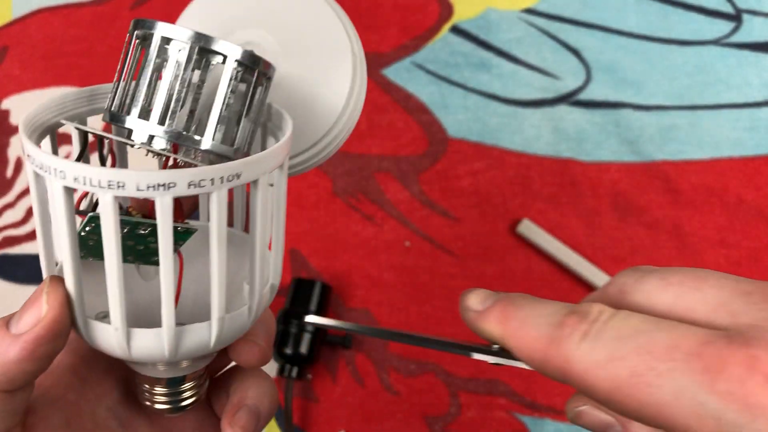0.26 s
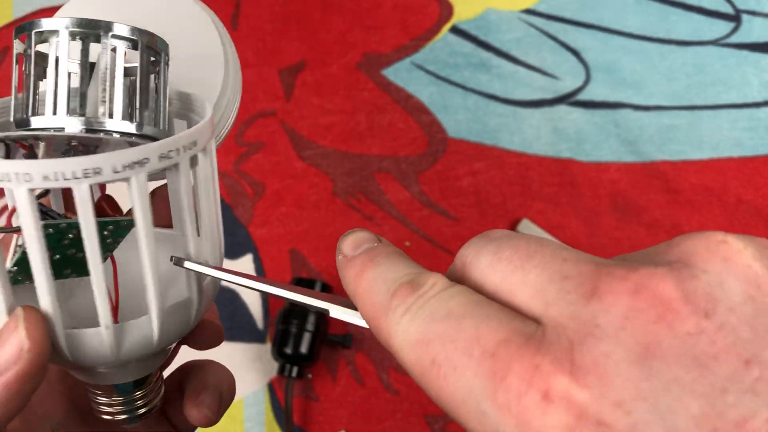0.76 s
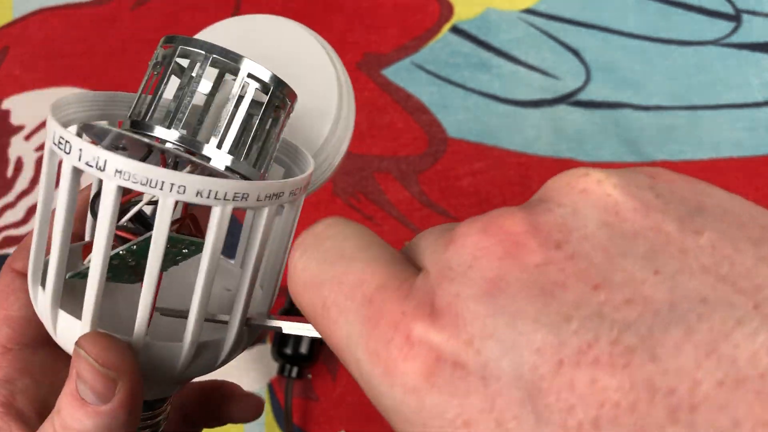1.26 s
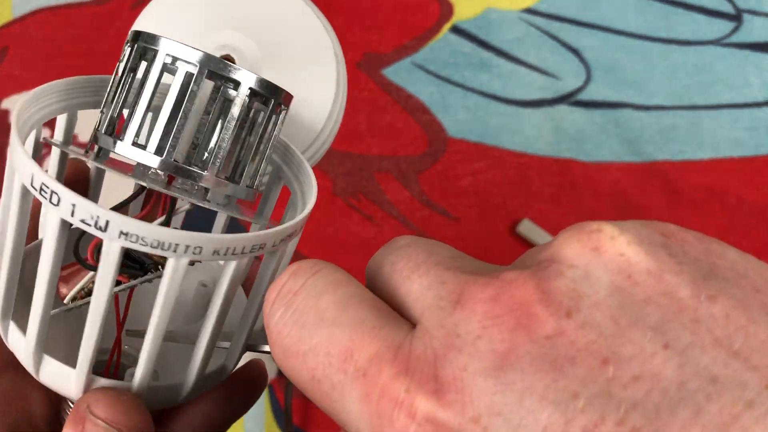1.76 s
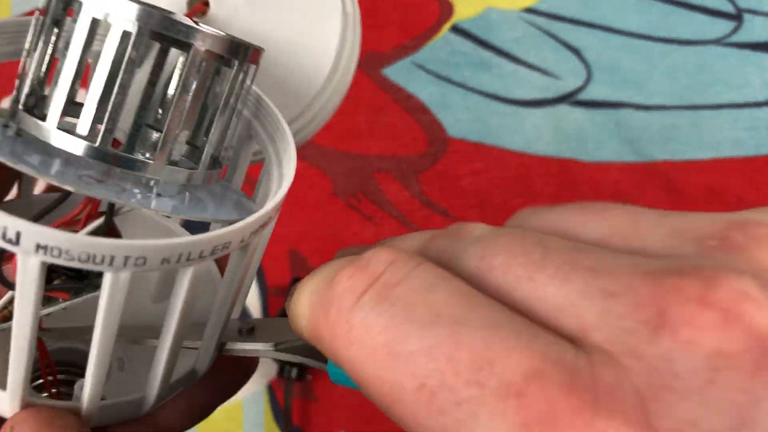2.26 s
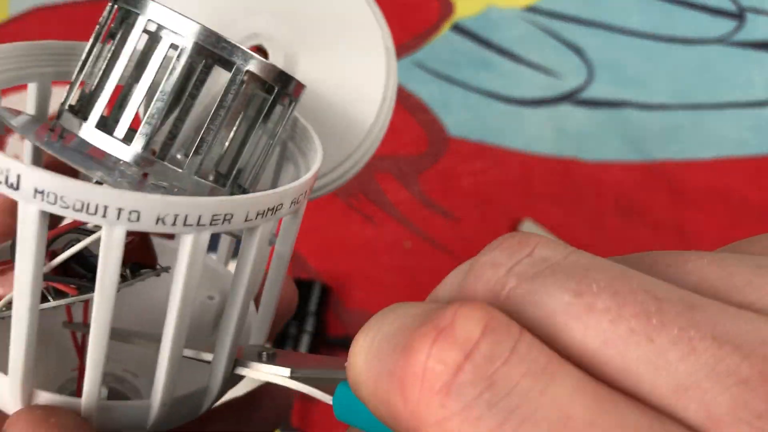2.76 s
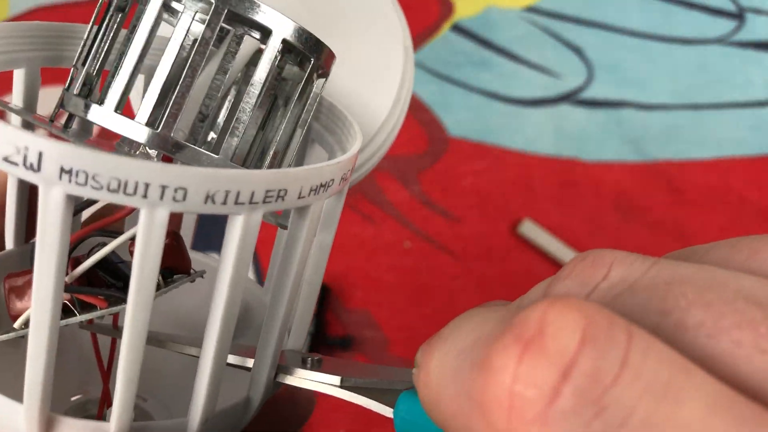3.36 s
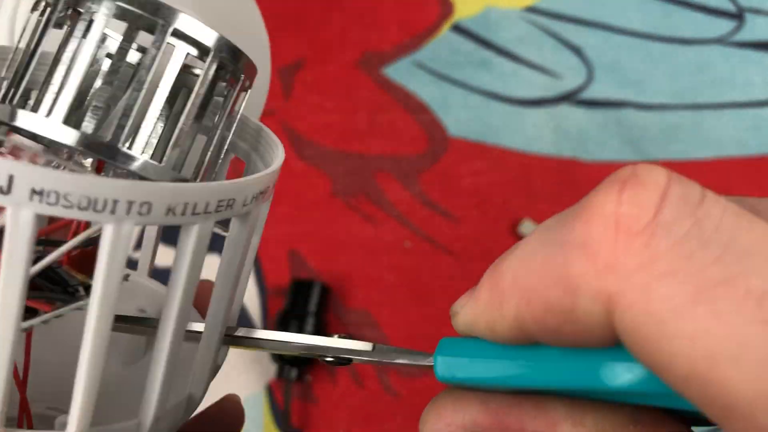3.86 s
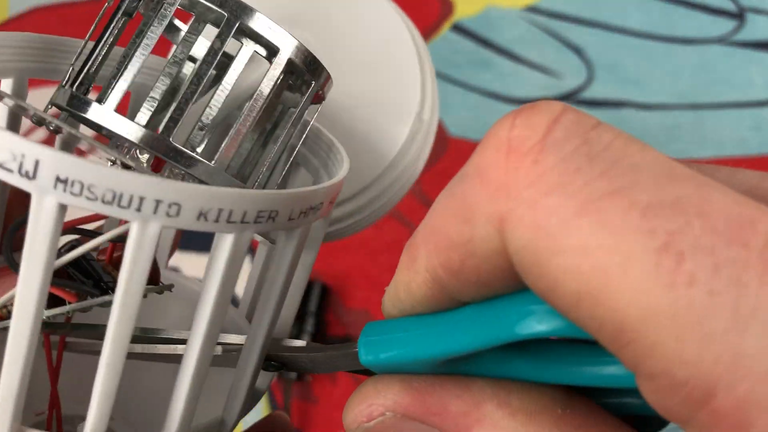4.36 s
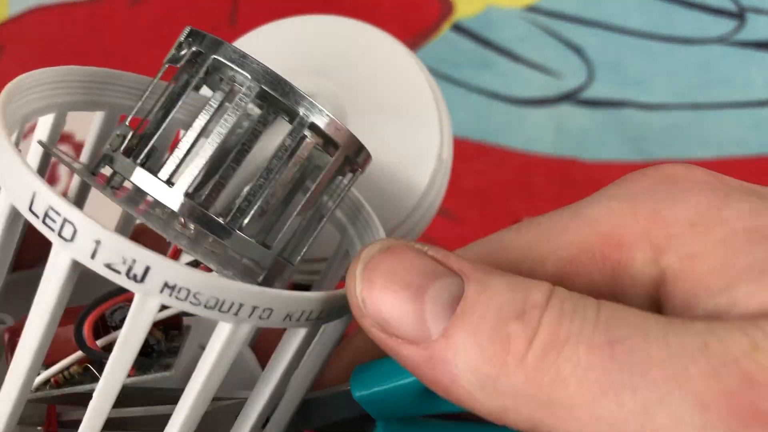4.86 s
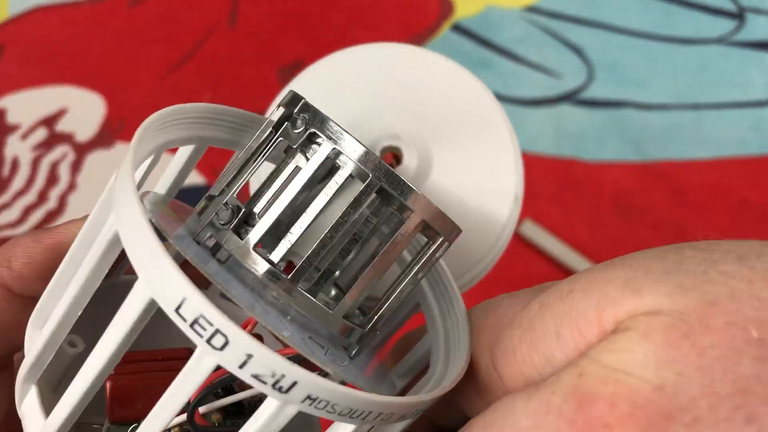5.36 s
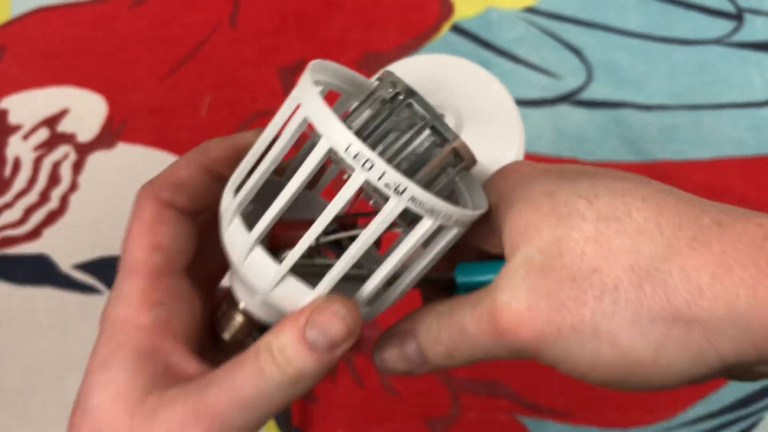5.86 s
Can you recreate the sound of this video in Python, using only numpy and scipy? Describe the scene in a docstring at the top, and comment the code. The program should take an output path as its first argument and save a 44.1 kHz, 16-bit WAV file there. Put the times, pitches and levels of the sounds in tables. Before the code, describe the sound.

In a small room with faint hiss and a low hum, a hand shifts softly on a hollow plastic bulb cage. Close to the microphone, scissor blades scrape its bars in short strokes, mixed with uneven clusters of small clicks, thin metallic slides and dull knocks. After a sharper click, the blades finally shut through a bar: one loud snap that sets the steel ringing briefly, with a short room echo.

```python
"""A short scrape of steel on plastic, close to the microphone in a small quiet room: scissors at work
on the cage of a lamp. The blades rasp on the bars and sing as they slide over each other, while the
hollow cage clicks and knocks in the hand. Near the end one bar snaps, a double crack that sets the
steel ringing and wakes the room. Room tone and mains hum lie below."""
import sys
import numpy as np
from scipy import signal
from scipy.fft import rfft, irfft
from scipy.io import wavfile
from scipy.ndimage import uniform_filter1d

SR = 44100
rng = np.random.default_rng(int(sys.argv[2]) if len(sys.argv) > 2 else 0)


def generate_wav(sig):
    """Save sig (samples, or channels by samples) to the path in sys.argv[1] as 16-bit PCM at SR."""
    pcm = np.round(np.clip(np.atleast_2d(sig).T, -1, 1) * 32767).astype(np.int16)
    wavfile.write(sys.argv[1], SR, pcm)


N = 269123
HZ = np.fft.rfftfreq(4096, 1 / SR)  # frequency axis of the filter curves
T = np.arange(8192) / SR  # time axis of one impact
LEAD_S = 0.06  # a stroke is already brushing this long before it has its full force

# an edge scrapes along a bar: t/s, length/s, relative level/dB, swell/dB, hollow body/dB re level
EDGE_STROKES = [(0.0, 0.0074, -56, -4, -5), (0.199, 0.029, -67.5, -5, -12), (0.86, .05, -68.5, 1, -9),
                (0.93, 0.034, -55.5, -3.5, 0.5), (1.065, 0.14, -60.5, 3.5, -10),
                (1.269, 0.023, -58, -2, 2.5), (1.695, .065, -66, 0, -3), (1.83, 0.0091, -65, 0, -11),
                (1.977, 0.053, -54, 3.5, -15), (2.17, .03, -70.5, -6, 0), (2.375, 0.051, -54, -3, -6.5),
                (2.458, 0.075, -73, 1, 5.5), (2.75, 0.13, -72, 5, -7), (3.26, .075, -69.5, 4.5, 0),
                (3.71, 0.044, -61, 3, -4.5), (3.769, 0.051, -52, -3, -13.5),
                (3.864, 0.067, -51.5, 5.5, -13), (4.17, 0.03, -54, 1, -23), (4.223, 0.018, -49.5, -1, 0),
                (4.26, 0.028, -67, -4, -3), (4.57, 0.094, -75.5, 5, -4), (4.688, 0.013, -66, 1, 11),
                (4.728, 0.025, -51.5, 4, -4.5), (5.062, 0.02, -63.5, 2, 0), (5.187, .01, -66, 0, 5),
                (5.32, .06, -72, -1, 0.5), (5.664, 0.02, -65, -8, -6), (6.047, .053, -65.5, -3, -20)]
# the cage is bumped and gives way: t/s, relative level/dB, f/Hz, t60/s, swing either side of f/octaves
CAGE_BUMPS = [(0.844, -52.5, 740, 0.03, 1), (0.93, -54, 910, 0.028, 0.68), (0.971, -49.5, 950, 0.02, 0.71),
              (0.998, -55.5, 170, 0.033, 0.62), (1.226, -52.5, 221, 0.045, 0.78),
              (1.497, -54.5, 1380, 0.04, 0.28), (1.733, -56.5, 400, 0.029, 0.84),
              (2.03, -52.5, 904, 0.016, 1.08), (2.147, -49, 175, 0.041, 0.72), (2.36, -57, 156, 0.042, 0.8),
              (2.48, -60, 132, 0.035, 0.67), (2.612, -54.5, 163, 0.056, 0.98),
              (3.778, -55, 170, 0.035, 0.73), (3.91, -46.5, 227, 0.058, 1.13),
              (3.927, -47, 200, 0.035, 0.77), (4.159, -49, 154, 0.051, 0.59), (4.22, -48, 434, 0.034, 0.47),
              (4.235, -45.5, 131, 0.032, 0.5), (4.266, -53.5, 227, 0.048, 0.8),
              (4.492, -48.5, 206, 0.065, 0.84), (4.7534, -33.5, 742, 0.03, 1.17),
              (4.769, -55, 400, 0.03, 1.04), (5.122, -57.5, 800, 0.025, 0.7),
              (5.228, -52, 193, 0.076, 0.79), (5.525, -62, 600, 0.042, 0.7)]
# modes of the plastic cage with the blades on it: f/Hz, level/dB, t60/s
CAGE_MODES = [(1225, 4.5, 0.04), (1665, 6, 0.078), (1986, 10.5, 0.085), (2890, 0, 0.061), (2910, -1, 0.049),
              (3890, 4.5, 0.079), (5240, -4, 0.038), (5550, -2, 0.064), (6250, -2, 0.029)]


def amp(db):
    """Decibels to gain."""
    return 10 ** (np.asarray(db) / 20)


def unit_rms(x):
    """Scales to rms 1."""
    return x / np.sqrt(np.mean(x ** 2) + 1e-20)


def unit_energy(x):
    """Scales to energy 1."""
    return x / (np.linalg.norm(x) + 1e-12)


def curve(points, hz=HZ):
    """Interpolates a table along a log-frequency axis."""
    f, value = np.transpose(points)
    return np.interp(np.log(hz + 1), np.log(f + 1), value)


def fade(t, t60):
    """Falls 60 dB in t60 seconds."""
    return np.exp(-np.log(1000) * t / np.maximum(t60, 1e-4))


def add(mix, s, sound):
    """Lays a sound into the mix at time s."""
    start = round(s * SR)
    sound = sound[max(-start, 0):]
    part = mix[max(start, 0):][:len(sound)]
    part += sound[:len(part)]


def colour(x, gain_db):
    """Minimum-phase filter with the given dB at the frequencies HZ."""
    log_gain = np.log(amp(np.maximum(gain_db, -100)))
    mirrored = np.r_[log_gain, log_gain[-2:0:-1]]
    response = np.exp(np.conj(signal.hilbert(mirrored)))
    return signal.oaconvolve(x, irfft(response[:len(HZ)]))[:len(x)]


def hump(hz, octaves, steep=1):
    """A peak in dB around hz."""
    return -10 * steep * np.log10(1 + (np.log2((HZ + 1) / hz) / octaves) ** 2)


def band(lo_hz, hi_hz, order=3):
    """A pass band in dB."""
    return -10 * np.log10((1 + (lo_hz / (HZ + 1)) ** (2 * order)) * (1 + (HZ / hi_hz) ** (2 * order)))


def flicker(samples):
    """Noise of rms 1, smoothed over this many samples."""
    return unit_rms(uniform_filter1d(rng.standard_normal(N), size=samples))


def stroke(length, db, swell_db, release_t60, attack_t60=0.053):
    """Force of one movement, from LEAD_S before its start: it bites, swells or sags, and lets go."""
    t = np.arange(SR // 2) / SR - LEAD_S
    hold = amp(db + swell_db * (np.clip(t / length, 0, 1) - 0.5))
    return fade(np.maximum(-t, 0), attack_t60) * hold * fade(np.maximum(t - length, 0), release_t60)


def room_tone(air_db=-69.5, rumble_db=-65, waver_rad=0.4):
    """The bed of the quiet room: air, a narrow low rumble and wavering mains hum."""
    # spectrum of the room air: f/Hz, relative level/dB
    air_spectrum = [(40, -21), (80, -11), (100, 0.5), (150, -8.5), (230, -11), (380, -20), (560, -23),
                    (1400, -31.5), (2300, -32), (2900, -31), (4000, -31), (10000, -32.5), (16000, -43.5)]
    # partials of the hum: f/Hz, level/dB
    hum_partials = [(58, -67), (120, -68.5)]
    t = np.arange(N) / SR
    air = colour(rng.standard_normal(N), curve(air_spectrum) + band(90, 20000))
    rumble = colour(rng.standard_normal(N), band(49, 67.5, order=8))
    hum = 0
    for hz, db in hum_partials:
        drift = sum(np.sin(2 * np.pi * (f * t + rng.random())) / np.sqrt(f)
                    for f in np.geomspace(0.3, 6, 20))
        hum += amp(db) * np.sqrt(2) * np.sin(2 * np.pi * hz * t + waver_rad * unit_rms(drift))
    return amp(air_db) * unit_rms(air) + amp(rumble_db) * unit_rms(rumble) + hum


def hand_rub(gain_db=-3, flutter_db=3, slip_db=-8):
    """Skin rubs softly and unevenly on the plastic; each knock makes the cage slip in the hand."""
    # steady rub of the holding hand: t/s, relative level/dB
    grip_levels = [(0.0, -67.5), (0.8, -68), (1.3, -65.5), (2.3, -69), (3.1, -74), (4.1, -67.5),
                   (5.4, -68.5), (6.1, -70)]
    # spectrum of skin on plastic: f/Hz, relative level/dB
    skin_spectrum = [(60, -17.5), (100, 0), (160, -1.5), (280, -2.5), (390, -2), (540, -14.5), (880, -14),
                     (2500, -19.5), (6000, -27)]
    slip = np.zeros(N)
    for s, db, *_ in CAGE_BUMPS:
        add(slip, s - LEAD_S, stroke(0.011, db + slip_db, swell_db=0, release_t60=0.09))
    grip = amp(np.interp(np.arange(N) / SR, *np.transpose(grip_levels)))
    flutter = amp(flutter_db * flicker(1200))
    rub = unit_rms(colour(rng.standard_normal(N), curve(skin_spectrum)) * flutter)
    return amp(gain_db) * np.hypot(grip, slip) * rub


def scraping(slips_per_s=5500, spread_db=2.5, judder_db=1.86, fizz_db=-6, hard_db=-52,
             blade_db=-13, blade_hz=2770, body_db=-1):
    """Tiny slips of steel on plastic rasp and stir the blades and hollow cage; hard strokes fizz."""
    # spectrum of the edge on a bar: f/Hz, relative level/dB
    rasp_spectrum = [(500, -20), (1200, -3), (1900, 0.5), (2300, -12), (2900, 0.5), (3800, 0), (5500, 1),
                     (7500, -2), (9000, -2), (11500, -6.5), (15500, -16)]
    # air and walls of the cage: f/Hz, relative level/dB
    hollow_spectrum = [(250, -14), (400, -2.5), (560, -10.5), (880, 0), (1050, -5), (1250, 1), (1500, -7.5),
                       (2500, -20)]
    force, body_force = np.zeros((2, N))
    for s, length, db, swell_db, hollow_db in EDGE_STROKES:
        push = stroke(length, db, swell_db, release_t60=0.078)
        add(force, s - LEAD_S, push)
        add(body_force, s - LEAD_S, amp(hollow_db) * push)
    sizes = amp(spread_db * np.minimum(rng.exponential(1, N), 4)) * rng.choice([-1, 1], N)
    judder = amp(judder_db * flicker(220))
    slipping = rng.random(N) < slips_per_s / SR
    slips = travelling_contact(sizes * slipping * judder)
    rasp = unit_rms(colour(slips, curve(rasp_spectrum)))
    hiss = unit_rms(colour(rng.standard_normal(N) * judder, band(9000, 15000)))
    fizz = hiss * np.sqrt(force / amp(hard_db))
    body = unit_rms(colour(slips, curve(hollow_spectrum)))
    edge = rasp + amp(fizz_db) * fizz + amp(blade_db) * blade_song(N, blade_hz)
    return force * edge + body_force * amp(body_db) * body


def travelling_contact(x, depth_db=4.5):
    """As the contact point travels, narrow resonances swell and fade."""
    spectra = signal.stft(x, nperseg=512, noverlap=384)[2]
    patches = uniform_filter1d(rng.standard_normal(spectra.shape), size=4, axis=0)
    patches = unit_rms(uniform_filter1d(patches, size=9, axis=1))
    return unit_rms(signal.istft(spectra * amp(depth_db * patches), nperseg=512, noverlap=384)[1][:N])


def blade_song(n, pitch_hz):
    """Even friction noise in the resonances of the blades."""
    # resonances of the sliding blades: multiple of the pitch, width/Hz, relative level/dB
    resonances = [(1, 364, 6.5), (3.15, 550, -8)]
    gain = sum(amp(db) / (1 + (2 * (HZ - k * pitch_hz) / width) ** 2) ** 0.69
               for k, width, db in resonances)
    return unit_rms(colour(rng.standard_normal(n), 20 * np.log10(gain)))


def glides(gain_db=-1):
    """Blade runs over blade as the scissors open and close; the pitch depends on where they touch."""
    # strokes of steel on steel: t/s, length/s, relative level/dB, swell/dB, f/Hz
    blade_strokes = [(0.0, 0.024, -61, -14, 3000), (0.178, 0.0091, -61.5, 3, 2940),
                     (0.489, .032, -75.5, -2, 2900), (1.209, 0.12, -67, 2, 2830),
                     (1.745, .04, -65, -6, 2830), (2.049, 0.047, -62.5, -2, 2830),
                     (2.4, .13, -65, -9, 2900), (2.597, .028, -70, -2, 2900), (2.741, 0.021, -63, 3, 3120),
                     (2.819, 0.056, -69, 1, 2830), (2.941, 0.03, -72, 0, 2830),
                     (3.021, 0.2, -75.5, 5, 2830), (3.247, .09, -62, -9, 2780),
                     (3.606, 0.023, -71.5, 7, 2830), (3.711, .1, -59.5, -7, 2950),
                     (4.23, .055, -59.5, -6, 2830), (4.554, 0.11, -64, 4, 3120), (4.7, 0.08, -56, -3, 2900),
                     (5.064, 0.019, -62, 1, 2950), (5.299, .09, -70, -4, 2900),
                     (6.059, .042, -62, -4, 2980)]
    out = np.zeros(N)
    for s, length, db, swell_db, hz in blade_strokes:
        push = stroke(length, db + gain_db, swell_db, release_t60=0.097)
        add(out, s - LEAD_S, push * blade_song(len(push), hz))
    return out


def chatter(t60, rise_s=0.0002):
    """A dying burst of tiny impacts, with an even spectrum."""
    onset = 1 - np.exp(-T / rise_s)
    burst = rng.standard_normal(len(T)) * onset * fade(T, t60)
    for _ in range(2):
        whitened = irfft(np.exp(1j * np.angle(rfft(burst))))
        burst = whitened * onset * fade(T, 2 * t60)
    return unit_energy(burst)


def impact(shape_db, t60, rise_s=0.0002):
    """A burst of chatter filtered to a spectrum, with energy 1."""
    return unit_energy(colour(chatter(t60, rise_s), shape_db))


def ring(modes, detune=0):
    """Dying modes; detune is how far the grip shifts them from blow to blow."""
    out = np.zeros(len(T))
    for hz, db, t60 in modes:
        pitch = hz * (1 + detune * rng.standard_normal())
        out += amp(db) * fade(T, t60) * np.sin(2 * np.pi * pitch * T)
    return unit_energy(out)


def click(db, hz, ring_db, edge_hz, t60, body_db=19, tone_db=20, cage_db=-10, ring_t60=0.034):
    """A contact chatters briefly and rings one mode and its neighbour, the rest of the cage faintly."""
    shape = amp(band(1840, edge_hz, order=5)) + amp(band(570, 1300) - 15)
    body = impact(20 * np.log10(shape), t60, rise_s=0.00019)
    cage = unit_energy(signal.fftconvolve(body, ring(CAGE_MODES, detune=0.06))[:len(T)])
    pair = [(hz, 0, ring_t60), (hz * rng.uniform(0.78, 1.16), -8, ring_t60)]
    tone = unit_energy(signal.fftconvolve(chatter(t60 / 2), ring(pair))[:len(T)])
    return amp(db) * (amp(body_db) * (body + amp(cage_db) * cage) + amp(tone_db + ring_db) * tone)


def clicks(scatter_s=0.15):
    """Blades and cage tick together, with one faint tick near each scrape as the blade seeks its place."""
    # clear contacts: t/s, relative level/dB, ring f/Hz, ring gain/dB, upper edge/Hz, chatter t60/s
    contacts = [(0.055, -49.5, 2050, -22, 6500, 0.024), (0.068, -59, 3570, 0, 9300, 0.019),
                (0.193, -55, 9980, 8, 11400, 0.019), (0.3407, -64.5, 4630, -7, 8950, 0.017),
                (0.432, -57, 3530, 6.5, 5200, 0.017), (0.663, -58.5, 2610, -8, 6500, 0.062),
                (0.671, -61, 2640, 2.5, 5100, 0.024), (0.796, -63, 3640, -11, 6200, 0.0066),
                (0.8184, -58.5, 1630, -5, 4300, 0.047), (0.8438, -55, 4300, -2, 7450, 0.0099),
                (0.9719, -53.5, 2860, 4, 3230, 0.013), (1.0533, -55.5, 2820, 0.5, 8200, 0.082),
                (1.225, -51, 2870, -11, 5600, 0.016), (1.2636, -45.5, 1180, -3.5, 11100, 0.065),
                (1.3107, -53.5, 10980, -3, 10900, 0.046), (1.403, -61, 1700, 3, 4600, 0.036),
                (1.4898, -52, 2400, -3.5, 4870, 0.079), (1.6482, -64, 1300, 3.5, 8500, 0.04),
                (1.678, -58, 2010, -3, 7500, 0.054), (1.7324, -42.5, 3260, -9, 7750, 0.071),
                (1.852, -63, 1640, 3, 2300, 0.022), (1.9382, -59.5, 1670, 5.5, 2680, 0.029),
                (1.9836, -54, 3110, 1, 9800, 0.047), (2.03, -48, 5200, -8, 9800, 0.02),
                (2.056, -46, 1930, -2, 6100, 0.049), (2.0694, -35.5, 2870, -16, 11200, 0.016),
                (2.146, -52.5, 1940, -2, 4900, 0.08), (2.1638, -51.5, 4920, -1.5, 10800, 0.023),
                (2.2608, -57, 1980, -0.5, 5570, 0.073), (2.3534, -49, 1670, -13, 7700, 0.033),
                (2.3616, -42, 1630, -2, 6830, 0.031), (2.4017, -41, 2020, -1.5, 9000, 0.027),
                (2.4504, -49, 1700, -1, 6500, 0.029), (2.4834, -40, 1620, -2.5, 8800, 0.05),
                (2.5225, -56, 1430, -2, 6100, 0.043), (2.802, -56, 10700, 3, 12400, 0.026),
                (2.8392, -58, 2740, -1, 7300, 0.029), (3.141, -56, 2710, -2, 4140, 0.021),
                (3.7462, -52, 2870, -12, 11300, 0.043), (3.7619, -43, 10230, -6, 13500, 0.068),
                (3.7768, -43.5, 2020, -5, 8100, 0.085), (3.825, -49, 1960, 4, 3000, 0.1),
                (3.906, -43.5, 2720, 0.5, 5900, 0.034), (3.9279, -43.5, 3430, -1.5, 4100, 0.015),
                (4.159, -54, 3510, 2, 8000, 0.051), (4.219, -50, 5970, -2, 8800, 0.042),
                (4.2236, -37.5, 5630, -4.5, 9100, 0.022), (4.227, -47, 2820, -4, 10300, 0.032),
                (4.2377, -41, 6300, -2, 7200, 0.015), (4.268, -40, 2700, -5.5, 9700, 0.044),
                (4.3014, -57.5, 3000, 1, 11000, 0.024), (4.3209, -55, 2240, -21, 4370, 0.044),
                (4.4918, -51.5, 3470, -0.5, 4400, 0.035), (4.6895, -48.5, 2700, -5, 10600, 0.048),
                (4.7538, -32.5, 5670, -7.5, 10500, 0.002), (4.7696, -48.5, 3770, 0, 4100, 0.077),
                (4.8556, -57, 1960, -3, 3900, 0.029), (5.009, -60, 11400, -6, 11300, 0.018),
                (5.122, -62, 2940, -1, 6000, 0.059), (5.182, -53.5, 4700, -9, 10900, 0.064),
                (5.2109, -52, 3160, -4, 4400, 0.065), (5.325, -51.5, 1580, -2.5, 3700, 0.051),
                (5.342, -50.5, 3210, 1, 4900, 0.011), (5.3701, -53, 1970, -5, 5700, 0.081),
                (5.421, -57.5, 6760, -3, 9900, 0.049), (5.451, -57.5, 1810, -8, 4200, 0.079),
                (5.524, -57.5, 3480, 0.5, 3500, 0.045), (5.6032, -56.5, 2710, -8, 3900, 0.035),
                (5.6542, -56, 6900, -6, 10300, 0.067), (5.6812, -54, 1600, -2, 4300, 0.025),
                (5.726, -45, 7330, -4, 11400, 0.023), (5.7385, -50, 3000, -5, 13000, 0.017),
                (6.0357, -50.5, 2990, -3, 12740, 0.016), (6.0467, -49.5, 2800, -9, 6300, 0.014),
                (6.059, -60, 3130, 4.5, 11700, 0.032), (6.0688, -48, 3010, 8, 6250, 0.015)]
    out = np.zeros(N)
    for s, *contact in contacts:
        add(out, s, click(*contact))
    for s, *_ in EDGE_STROKES:
        when, size, pitch, bright = rng.random(4)
        tick = click(-71 + 4 * size, 1300 + 3000 * pitch, 1, edge_hz=3500 + 5000 * bright, t60=0.038)
        add(out, s + scatter_s * (2 * when - 1), tick)
    return out


def knocks(gain_db=20, rattle_db=-6, fall_cycles=2.43, rise_s=0.00075):
    """A bending wave runs through the cage, high notes first: a dull knock that falls in pitch."""
    out = np.zeros(N)
    for s, db, hz, t60, swing in CAGE_BUMPS:
        pitch = hz * 2 ** (swing * (2 * np.exp(-T * hz / fall_cycles) - 1))
        envelope = (1 - np.exp(-T / rise_s)) * fade(T, t60)
        bend = unit_energy(np.sin(2 * np.pi * np.cumsum(pitch) / SR) * envelope)
        rattle = impact(hump(hz, 0.55, steep=1.8) + band(150, 1200), t60)
        add(out, s, amp(db + gain_db) * (bend + amp(rattle_db) * rattle))
    return out


def snap(shut_s=5.7502, crack_db=18, splinter_db=-10, clash_db=1, cage_db=-14):
    """The bar cracks through and splinters; the blades clash shut, and metal and cage shimmer on."""
    # the two steps of the break: t/s, relative level/dB, f/Hz, width/octaves, t60/s
    cracks = [(5.7490, -14.5, 2800, 0.95, 0.00317), (5.7497, -11.5, 7840, 0.96, 0.0058)]
    # crowded modes of the steel: f/Hz, spread/Hz, level/dB, t60/s
    steel_modes = [(7360, 156, -3.5, 0.35), (7650, 690, -5.5, 0.35)]
    out = np.zeros(N)
    for s, db, hz, octaves, t60 in cracks:
        shape = hump(hz, octaves, steep=2.67) + band(1100, 20000, order=1)
        add(out, s, amp(db + crack_db) * impact(shape, t60, rise_s=0.00043))
    add(out, shut_s, amp(splinter_db) * impact(band(2500, 15000), t60=0.076))
    add(out, shut_s, amp(clash_db) * ring([(7060, 0, 0.0082), (9160, -1.8, 0.0078)]))
    add(out, shut_s, amp(cage_db) * ring(CAGE_MODES, detune=0.027))
    age = np.arange(SR // 2) / SR
    for hz, spread, db, t60 in steel_modes:
        shape = -20 * np.log10(1 + ((HZ - hz) / (2 * spread)) ** 4)
        shimmer = colour(rng.standard_normal(len(age)), shape) * fade(age, t60)
        add(out, shut_s, amp(db) * unit_energy(shimmer))
    return out


def hollow_thud(s=5.761, db=-17.5):
    """A low, hollow thud follows just after the snap, as the room answers."""
    out = np.zeros(N)
    add(out, s, amp(db) * impact(band(310, 900), t60=0.07, rise_s=0.0023))
    return out


def room(x, wet_db, gap_s=0.0115, early_db=4, early_s=0.039):
    """The near walls answer after a short gap, strongly at first; each band dies at its own speed."""
    # decay of the small room: f/Hz, t60/s
    decay_times = [(150, 0.5), (500, 0.39), (2000, 0.43), (7000, 0.29), (15000, .25)]
    # colour of the reflections: f/Hz, level/dB
    wall_colour = [(100, -2), (400, 3), (1000, 2), (2500, -8.5), (5000, -0.5), (7300, -1), (10000, -4),
                   (15000, 0.5)]
    age = np.arange(SR // 2) / SR
    reflections = rng.standard_normal(len(age)) * amp(early_db * np.exp(-age / early_s))
    hz, t, spectra = signal.stft(reflections, SR, nperseg=256)
    decay = fade(t, curve(decay_times, hz)[:, None])
    tail = unit_energy(signal.istft(spectra * decay, SR, nperseg=256)[1])
    out = np.zeros(N)
    add(out, gap_s, signal.fftconvolve(x, colour(tail, curve(wall_colour))))
    return amp(wet_db) * out


def scene():
    """Scissors, cage and hand close to one microphone, with the room behind them."""
    work = clicks() + knocks() + scraping() + glides() + hollow_thud()
    crack = snap()
    cutting = work + room(work, wet_db=-16) + crack + room(crack, wet_db=-8)
    return (cutting + hand_rub() + room_tone())[None]


def record(dry, low_cut_hz=46, ceiling=0.75, high_cut_hz=16000):
    """The recorder cuts the deepest bass, rounds off the loudest peaks and limits the band."""
    x = signal.sosfilt(signal.butter(8, low_cut_hz, "highpass", fs=SR, output="sos"), dry)
    x = x / (1 + (x / ceiling) ** 4) ** (1 / 4)
    lowpass = signal.firwin(255, high_cut_hz, window=("kaiser", 8), fs=SR)
    return signal.oaconvolve(x, lowpass[None], "same")


dry = scene()
out = record(dry)
generate_wav(out)
```